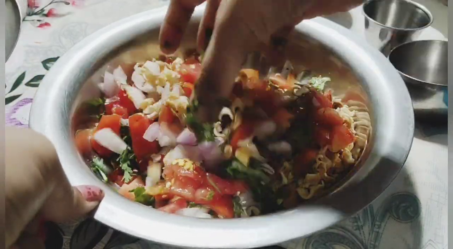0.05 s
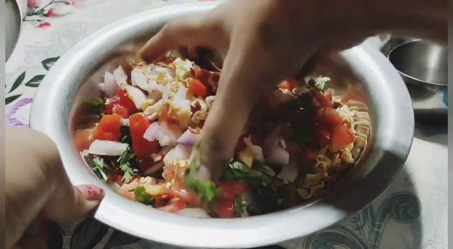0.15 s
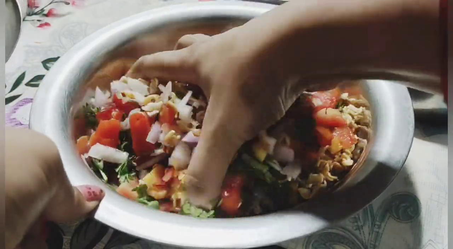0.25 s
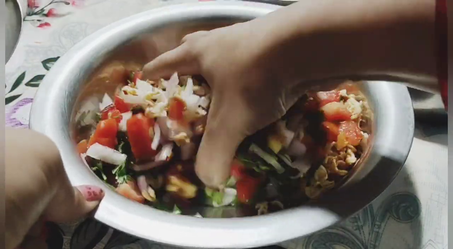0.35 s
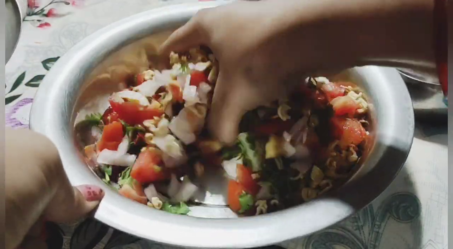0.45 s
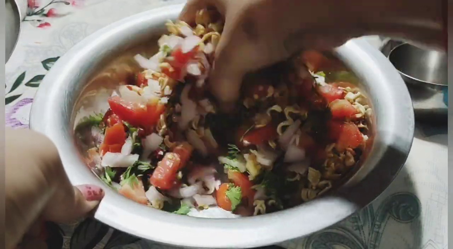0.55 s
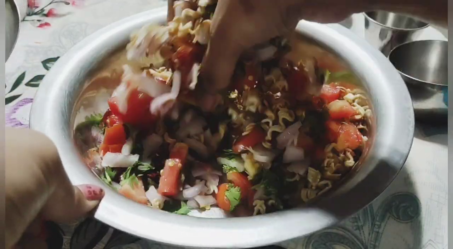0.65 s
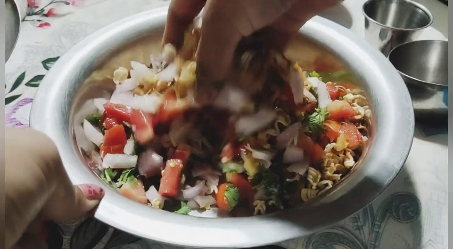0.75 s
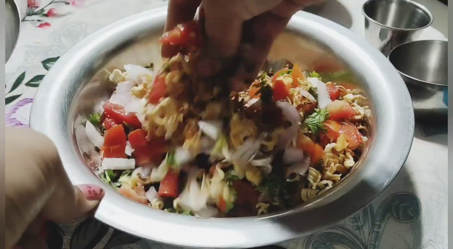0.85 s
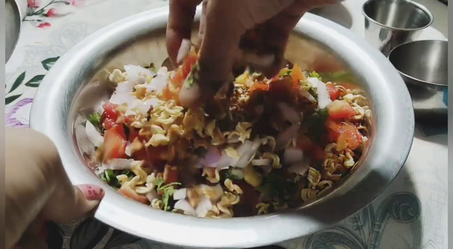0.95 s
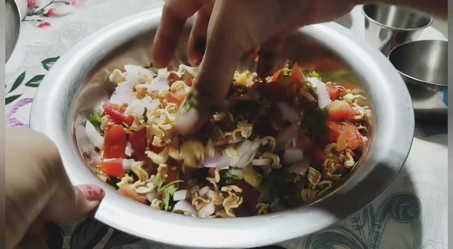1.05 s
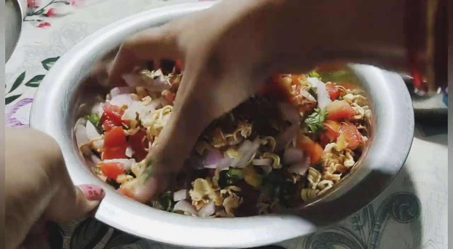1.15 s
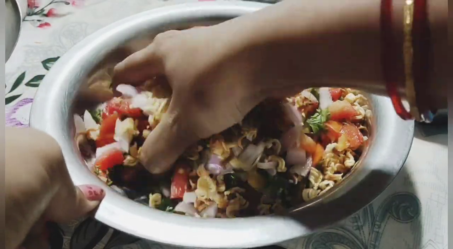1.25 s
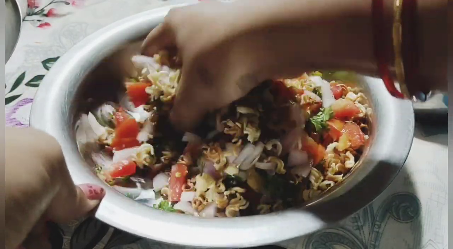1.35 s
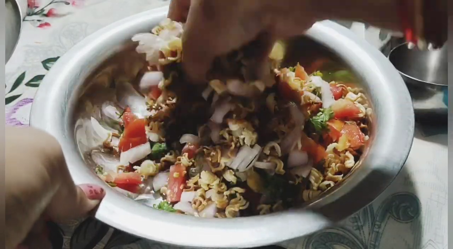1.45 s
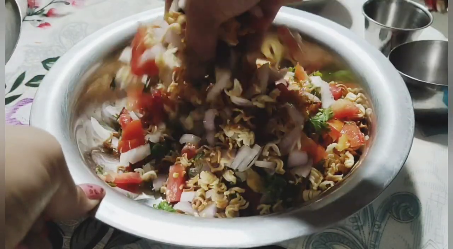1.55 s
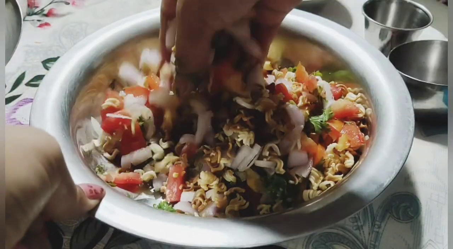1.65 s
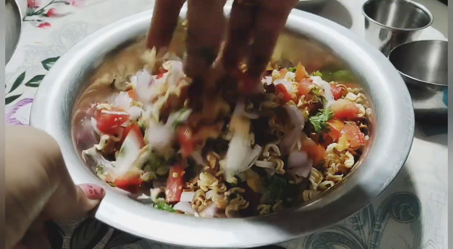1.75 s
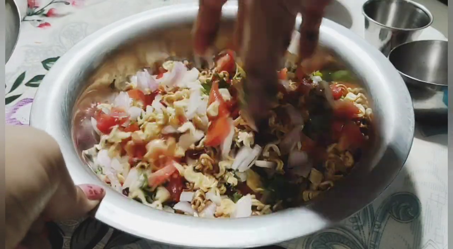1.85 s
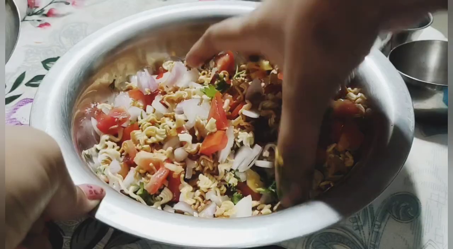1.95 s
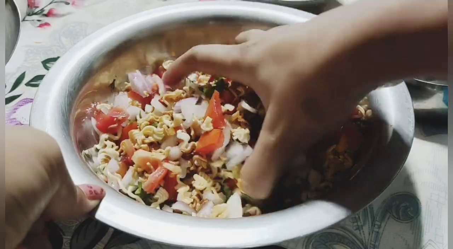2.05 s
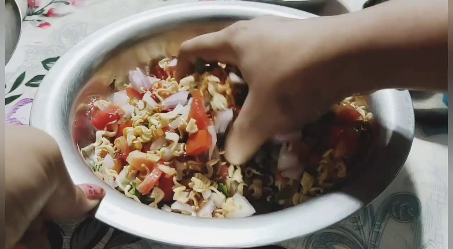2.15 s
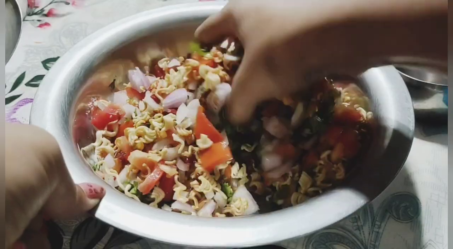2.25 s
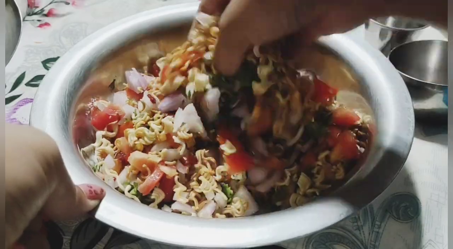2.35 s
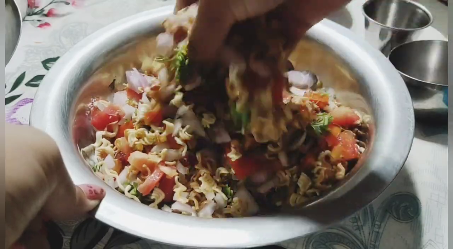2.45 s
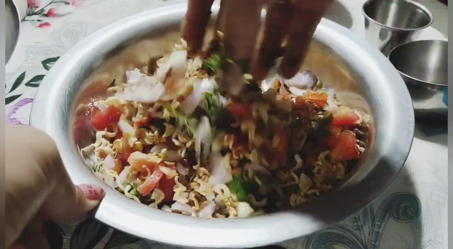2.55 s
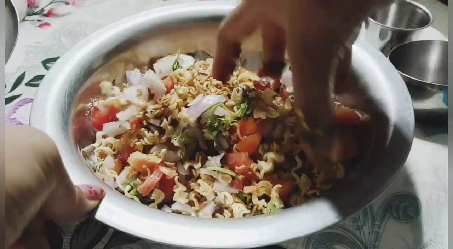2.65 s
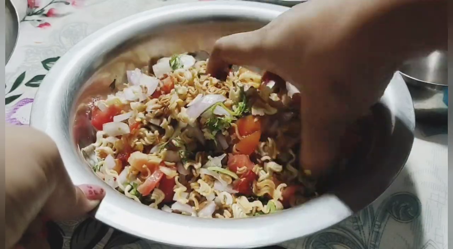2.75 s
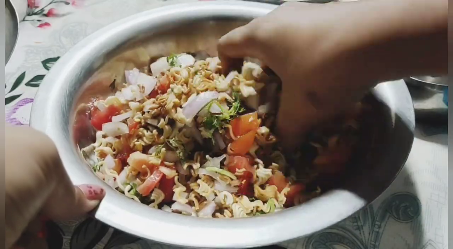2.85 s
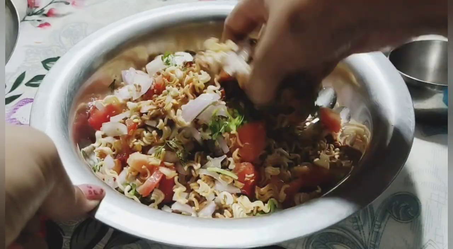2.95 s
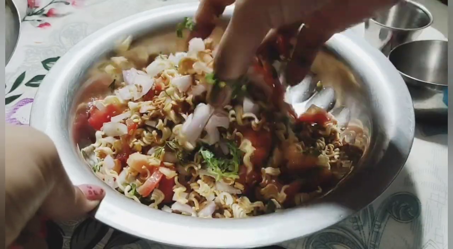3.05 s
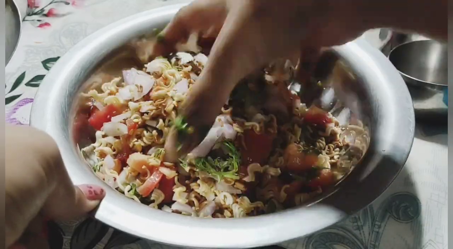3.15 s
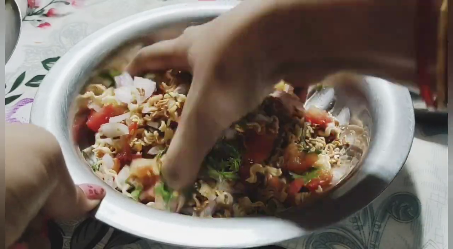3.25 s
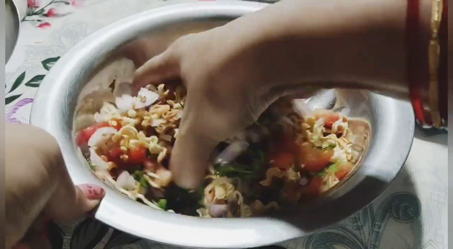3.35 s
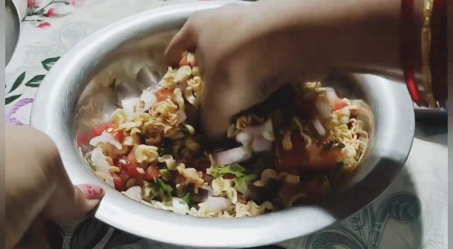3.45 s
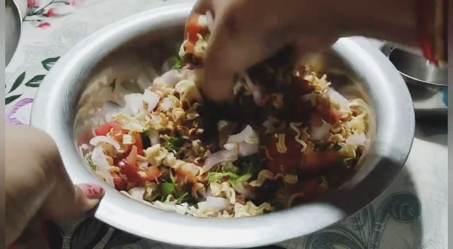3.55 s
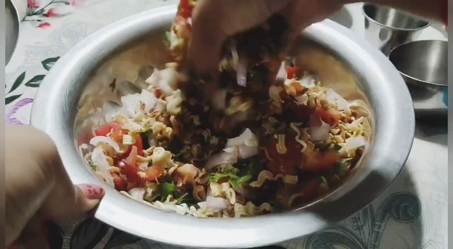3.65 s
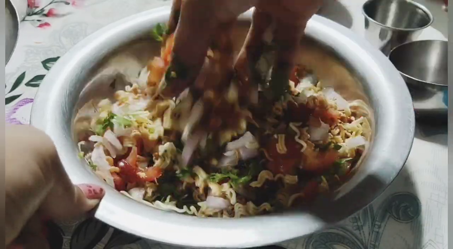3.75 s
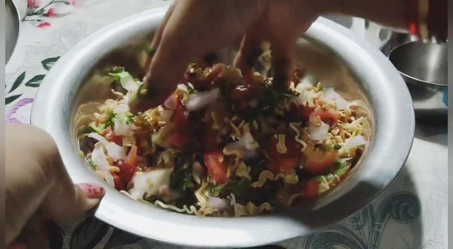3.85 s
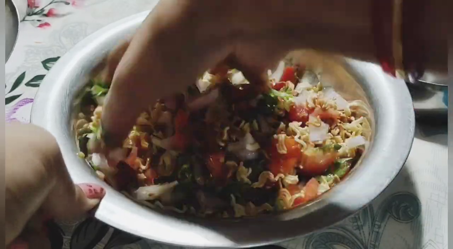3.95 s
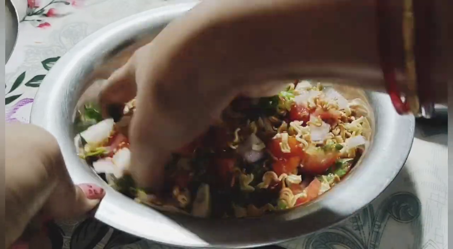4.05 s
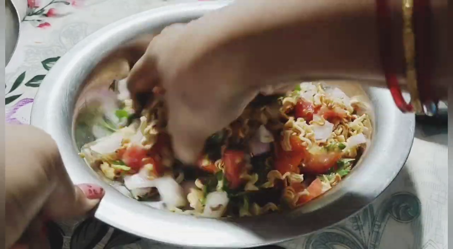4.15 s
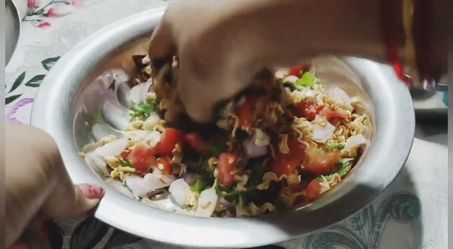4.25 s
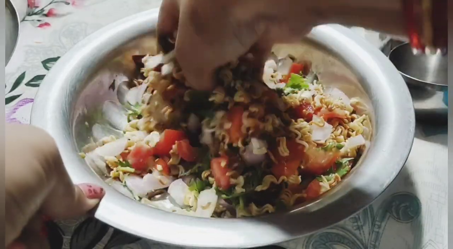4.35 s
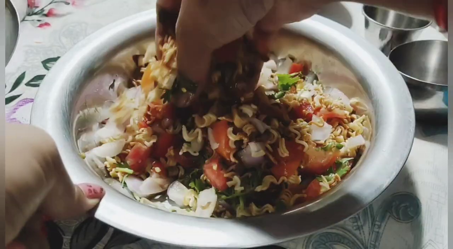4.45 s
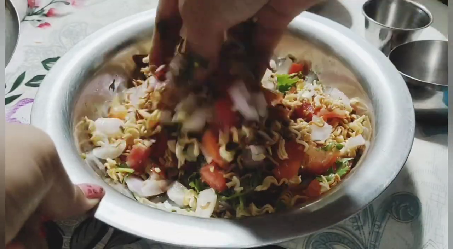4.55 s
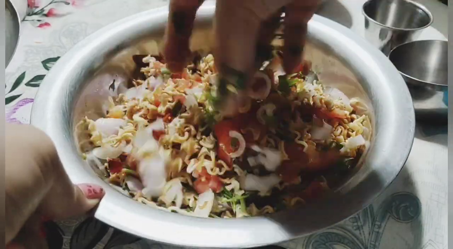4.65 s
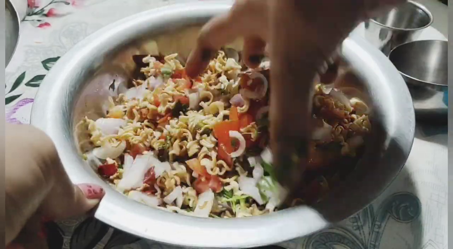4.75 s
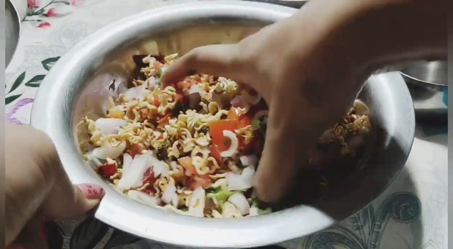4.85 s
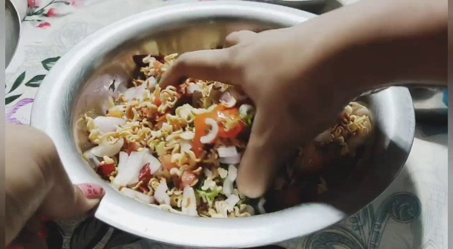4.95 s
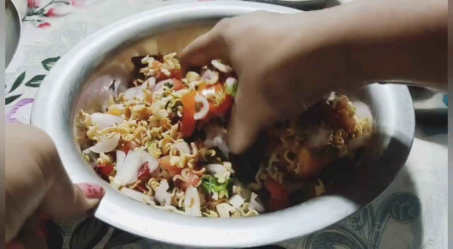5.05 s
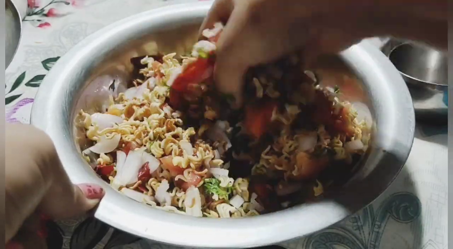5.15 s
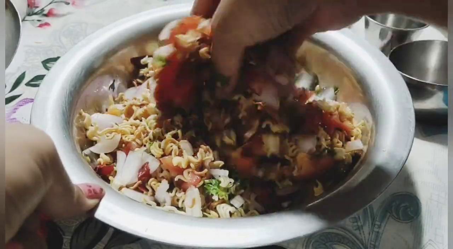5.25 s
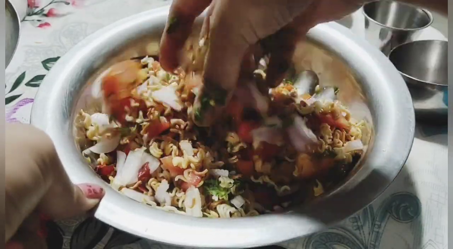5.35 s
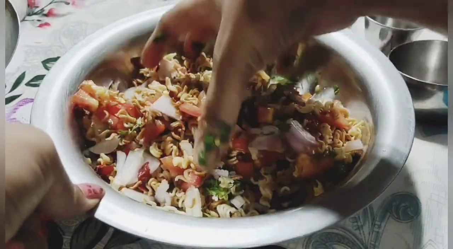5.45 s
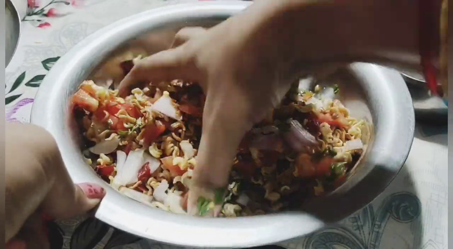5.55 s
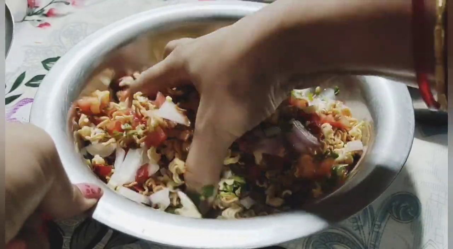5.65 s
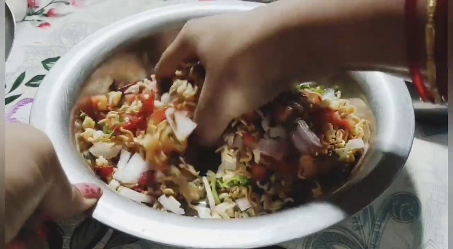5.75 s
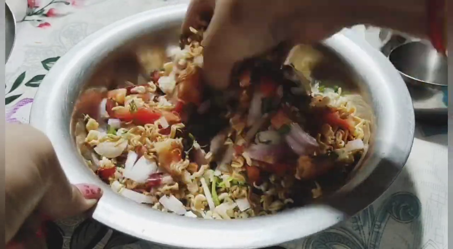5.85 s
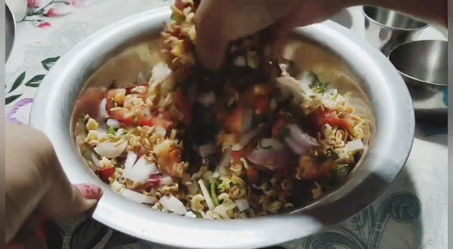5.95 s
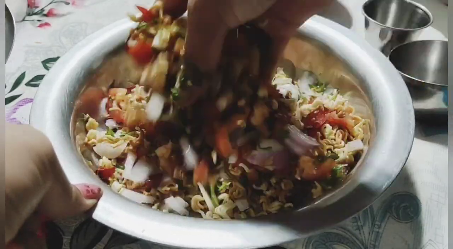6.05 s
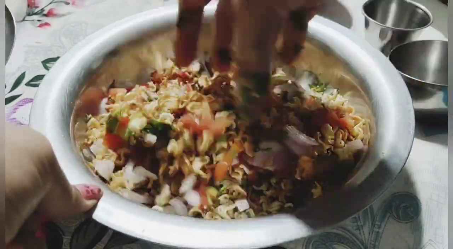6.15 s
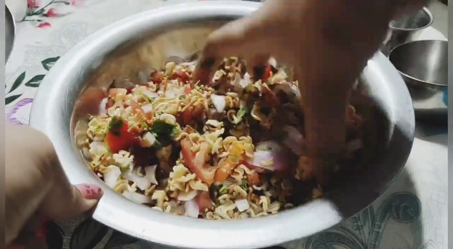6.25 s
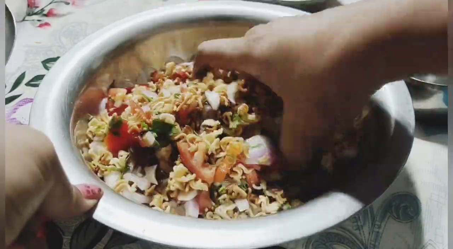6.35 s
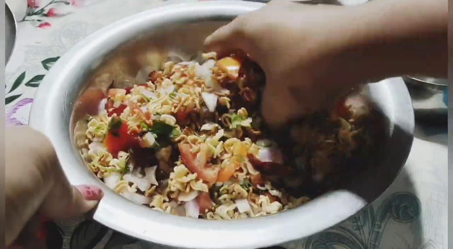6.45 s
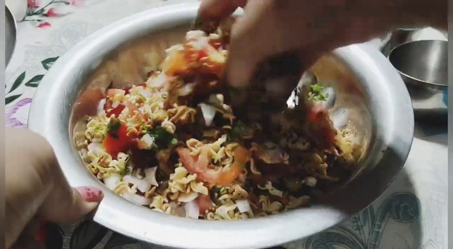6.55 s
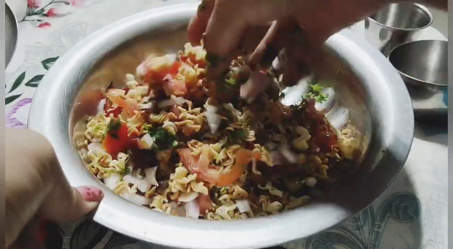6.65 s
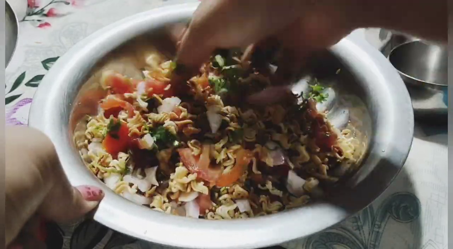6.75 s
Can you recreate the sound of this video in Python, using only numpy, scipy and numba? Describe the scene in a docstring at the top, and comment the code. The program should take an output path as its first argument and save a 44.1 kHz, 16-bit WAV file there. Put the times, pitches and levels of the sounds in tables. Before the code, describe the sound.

A close, dry stereo pickup in a small room with a barely audible hush. From the start a hand squeezes crisp noodle pieces in a steel bowl, dense crackle peaking near 0.3 s, then bits shower back around 0.6-0.9 s with very sharp snaps. Further crunchy scoops swell near 1.2, 2.0, 2.7 and 3.3 s, each with gritty grinding, muted steel scraping and low bowl bumps, followed by short pattering spills. A dull knock falls at 1.8 s and a hard snap at 2.5 s. Thin bangles clink faintly near 1.6, 3.05 and 3.75 s. Scoops around 4.1, 4.9 and 5.7 s are quieter, with more scrape and sparse ticks between. A fuller crunch returns near 6.3 s with a bright snap, then loose crumbs trickle until a last tick at 6.8 s.

```python
"""A hand tosses crisp fried noodle pieces and chopped vegetables in a steel bowl on a table, close to a phone.
Scoops crush the heap into a dense crackle of tiny filtered fractures, scrape the food-damped steel and bump
the bowl on the table. Loose food showers back, clumps grind on the wall and single pieces snap with sharp
ticks, each a short ring and a noisy crack. Soft thuds are swinging tones, bangles clink on the wrist as
fading sines, and a small room answers with decaying noise over a faint hush."""
import sys
import numpy as np
from scipy import signal
from scipy.fft import rfft, irfft, next_fast_len
from scipy.io import wavfile
from scipy.ndimage import uniform_filter1d
from numba import njit

SR = 44100
rng = np.random.default_rng(int(sys.argv[2]) if len(sys.argv) > 2 else 0)


def persist_wave(psi):
    """Save psi, clipped to +-1, as 16-bit WAV."""
    counts = np.round(np.clip(psi, -1, 1) * 32767).astype(np.int16)
    wavfile.write(sys.argv[1], SR, np.atleast_2d(counts).T)


N = 300476


def undb(db):
    """Decibels to gain."""
    return 10 ** (np.asarray(db) / 20)


def unit(x):
    """Scale to rms 1."""
    return x / np.sqrt(np.mean(x ** 2))


def unit_energy(x):
    """Scale each channel to energy 1."""
    return x / np.linalg.norm(x, axis=-1, keepdims=True)


def convolve(x, response):
    """Pass a stereo signal through a response."""
    return signal.fftconvolve(x, np.atleast_2d(response), axes=1)[:, :x.shape[1]]


def add(out, s, sound):
    """Mix a stereo sound in at time s."""
    start = max(int(s * SR), 0)
    out[:, start:start + sound.shape[1]] += sound[:, :max(N - start, 0)]


def walk(rate):
    """Random levels held 1 / rate s and slewed, scaled to rms 1."""
    hold = int(SR / rate)
    levels = rng.standard_normal(N // 20)[:N // hold + 1]
    return unit(uniform_filter1d(np.repeat(levels, hold), hold)[:N])


def colour(points, size=2048):
    """Minimum-phase response of unit energy with the given (Hz, dB) outline."""
    hz, db = np.transpose(points)
    bin_hz = np.arange(size // 2 + 1) * SR / size
    log_gain = np.log(undb(np.interp(np.log(bin_hz + 1), np.log(hz), db)))
    # folding the cepstrum forward in time makes the response causal
    fold = np.r_[1, np.full(size // 2 - 1, 2), np.zeros(size // 2)]
    return unit_energy(irfft(np.exp(rfft(irfft(log_gain) * fold))))


@njit
def resonate(x, hz, width):
    """State-variable band-pass whose centre may move, gain 1 at the centre."""
    y, band, low = np.empty(len(x)), 0., 0.
    for i in range(len(x)):
        g, damping = np.tan(np.pi * hz[i] / SR), width / hz[i]
        v = (band + g * (x[i] - low)) / (1 + g * (g + damping))
        band, low, y[i] = 2 * v - band, low + 2 * g * v, damping * v
    return y


def body(x, modes, drift, patchy_db, shifts_per_s=11):
    """Ring (Hz, width, dB) modes; shifting food retunes them and the moving hand favours one, then another."""
    load, out = walk(shifts_per_s), 0
    for k, (hz, width, db) in enumerate(modes):
        centre = hz * np.exp(drift * (load + walk(shifts_per_s)))
        favour = unit(undb(patchy_db * walk(shifts_per_s)))
        gain = (-1) ** k * undb(db) * favour  # neighbouring modes swing in opposition
        out = out + np.array([resonate(side * gain, centre, float(width)) for side in x])
    return out / np.sqrt(sum(undb(2 * db) * np.pi * width / SR for _, width, db in modes))


def grains(rate, spread_db, port_lag_s=0.00045):
    """Tiny contacts of uneven size, rms 1; each reaches the two microphones with its own lag."""
    chance, sign, place = rng.random((3, N))
    size = undb(spread_db * np.minimum(rng.exponential(size=N), 4))
    hits = (chance < rate / SR) * size * np.sign(sign - .5) / np.sqrt(rate)
    lag = np.round((2 * place - 1) * port_lag_s * SR).astype(int)
    arrival = np.clip(np.arange(N) + lag, 0, N - 1)
    return unit(np.array([hits, np.bincount(arrival, hits, N)]))


def scatter(x, echo_db, fade_s, moves_per_s=9, size=512, count=7):
    """Add the quick echoes inside the bowl; they differ for each microphone and change as the hand moves."""
    fade = np.exp(-np.arange(size) / SR / fade_s)
    paths = unit_energy(rng.standard_normal((count, 2, size)) * fade)
    paths[:, :, 0] = 0
    shares = np.array([walk(moves_per_s) for _ in range(count)])
    shares /= np.linalg.norm(shares, axis=0)
    echoes = sum(convolve(x * share, path) for share, path in zip(shares, paths))
    return (x + undb(echo_db) * echoes) / np.sqrt(1 + undb(2 * echo_db))


def squeeze(t, start, hardest, end, swell_power=1, ease_power=2.15):
    """Effort of one scoop, 0-1: it swells to its hardest, then eases as the hand lifts."""
    swell, ease = np.clip([(t - start) / (hardest - start), (end - t) / (end - hardest)], 0, 1)
    return np.sin(np.pi / 2 * swell) ** swell_power * np.sin(np.pi / 2 * ease) ** ease_power


def shower(t, start, length, attack_s=0.013, sag_db=4.5, release_s=0.017, crumbs_db=-8.5, crumbs_s=0.051):
    """Flow of one spill, 0-1: a quick attack, a sagging hold, a release and a trickle of crumbs."""
    age = t - start
    after = np.maximum(age - length, 0)
    hold = undb(-sag_db * np.clip(age / length, 0, 1))
    release = np.maximum(np.exp(-after / release_s), undb(crumbs_db) * np.exp(-after / crumbs_s))
    return np.clip(age / attack_s, 0, 1) * hold * release


def handwork(scrape_lag_s=0.016, push_lead_s=0.014, size=4096):
    """Levels in dB of crackle, coarse crunch, splinters, scrape and push; all moves add in power."""
    # the hand digs in, squeezes and lifts: start_s, hardest_s, end_s, crackle_db,
    # then over the crackle: coarse_db, crisp_db, scrape_db, push_db
    scoops = [(0.005, 0.297, 0.71, -25, -4.5, -7, -3, -13),
              (0.996, 1.204, 1.56, -25.5, -6, -6, -6.5, -13.5),
              (1.881, 2.037, 2.487, -29.5, -1, -6.5, -1.5, -8),
              (2.641, 2.668, 3.093, -24, -5.5, -6, -7, -15),
              (3.107, 3.32, 3.71, -27, -3.5, -9.5, -5.5, -14.5),
              (3.674, 4.12, 4.35, -36.5, 1, -5.5, -1, -8), (4.71, 4.906, 5.147, -36.5, -1, -6, 3, -2.5),
              (5.441, 5.671, 5.97, -34, 2.5, -6, 1.5, -10),
              (6.161, 6.32, 6.63, -29.5, -8.5, -7, -4.5, -15.5)]
    # loose food showers back on the heap: start_s, length_s, crackle_db,
    # then over the crackle: coarse_db, crisp_db, scrape_db, push_db
    spills = [(0.573, 0.056, -32, -10, -3, 2, -10.5), (0.648, 0.11, -34, 4, 1, 3, -8),
              (0.826, 0.12, -31, -3, -6.5, -8, -8), (0.966, 0.086, -32, -17, -4, -10, -7),
              (1.417, 0.086, -28, -4.5, -3.5, -7, -8), (1.559, 0.065, -32.5, 0, 1.5, -6, -12),
              (1.733, 0.09, -33.5, 3.5, -10, -19, -8), (1.784, 0.085, -34, 3.5, -1.5, 0.5, -9),
              (2.448, 0.081, -35.5, 5.5, -1, 0, -4), (2.516, 0.14, -32.5, -6, -10.5, -7.5, -16),
              (2.984, 0.054, -35.5, -3.5, -8.5, -5, -13), (3.031, 0.079, -30, 3, -2, -9, -24),
              (3.549, 0.069, -35.5, 3, -5.5, -0.5, -17), (3.726, 0.089, -31.5, -4, -4, -9, -21),
              (3.826, 0.16, -35.5, -6, -11, -8, -10.5), (4.261, 0.072, -40.5, 1.5, -3.5, 0, -23),
              (4.375, 0.074, -46, 2, 2, -8, -7), (4.458, 0.045, -28.5, -3, -4, -18, -19),
              (4.614, 0.047, -35.5, -5, -2, -14, -19), (4.641, 0.057, -32, -6.5, -5, -7, -23),
              (5.095, 0.082, -50, 2, -9, 0, -3), (5.298, 0.052, -48.5, -7, -4.5, -7, 0),
              (5.369, 0.038, -39, -7, -7.5, -1, -3), (5.46, 0.047, -28.5, -20, -7, -6, -8.5),
              (6.029, 0.047, -44, 0, -6, -29, -20), (6.057, 0.097, -33.5, 0.5, -2, -21, -6.5),
              (6.179, 0.073, -30.5, -0.5, -11, -23, -8), (6.459, 0.045, -30, -6, -19, -6, -29),
              (6.649, 0.01, -36.5, 2.5, -58, 0, -1), (6.721, 0.099, -40, -15, -27, -1, -6),
              (6.774, 0.047, -35, -11, -5, -13, -7.5)]
    # the heap settling between tosses: crackle_db, coarse_db, crisp_db, scrape_db, push_db
    settling = (-56, -63.5, -62, -57, -54)
    t = np.linspace(0, N / SR, size)
    # in a scoop the food meets the wall a little after the squeeze; the fingers bump the bowl a little before
    lagged = t - np.array([0, 0, 0, scrape_lag_s, -push_lead_s])[:, None]
    moves = [(squeeze(lagged, start, hardest, end), levels) for start, hardest, end, *levels in scoops]
    moves += [(shower(t, start, length), levels) for start, length, *levels in spills]
    power = undb(settling)[:, None] ** 2
    for shape, (db, *over_db) in moves:
        peak = undb(db + np.array([0, *over_db]))[:, None]
        power = power + (shape * peak) ** 2
    return [np.interp(np.arange(N) / SR, t, 10 * np.log10(p)) for p in power]


def strands(points, rate, spread_db, low_hz, high_hz, width_hz, snap_db, port_lag_s,
            wander=0.8, count=13, size=110):
    """Fractures of rms 1; each strand breaks for a few ms and rings over a broad crack, in wandering pitch."""
    breaks = grains(rate, spread_db, port_lag_s)
    own = np.repeat(rng.standard_normal(N // size + 1), size)[:N]
    strand = np.round(count / 2 + 2 * own + wander * walk(25)) % count  # a clump shares its pitch
    rings = 0
    for k, hz in enumerate(np.geomspace(low_hz, high_hz, count)):
        b, a = signal.iirpeak(hz, max(hz / width_hz, 1), fs=SR)
        rings = rings + signal.lfilter(b, a, breaks * (strand == k))
    fractures = unit(rings) + undb(snap_db) * breaks
    return unit(convolve(scatter(fractures, echo_db=0.5, fade_s=0.0043), colour(points)))


def crackle(db, coarse_db, crisp_db, fractures_per_s=1500, firm_db=-34, thin_db=-2.0, thick_db=-1.76,
            edge_db=0, clump_db=1.3, shift_db=1.1, air_db=-12, air_growth=0.73):
    """Noodles crush in small avalanches; a harder squeeze breaks more strands and grinds out airy crumbs."""
    # colours of thin strands, thick pieces, splinters and crumbs: pitch_hz, level_db
    thin_colour, thick_colour = [(800, -27.5), (1800, -34.5), (2500, -8.5), (3300, -6), (4300, -6),
                                 (5000, -7.5), (5600, -26), (7000, -27), (10000, -52), (16000, -40)], [(250, -31), (600, -5), (1100, 4.5), (1450, 3.5),
                                                 (1950, 8.5), (2700, 2.5), (3500, 9), (6000, -2),
                                                 (12000, -66)]
    splinter_colour, crumb_colour = [(2000, -17.5), (5500, -0.5), (7000, -5), (8200, 0.5), (9100, -1.5),
                                     (10300, -3), (11800, -8), (14000, -10), (15500, -13.5)], [(4000, -21), (6200, 7), (8000, -12), (11000, 4.5),
                                                    (13500, 1), (15500, -13)]
    rate = fractures_per_s * undb(.6 * (db - firm_db)) + 400
    airy_db = crisp_db + air_db + air_growth * (db - firm_db)
    db = db + clump_db * walk(220)
    thin = strands(thin_colour, rate, spread_db=2.0, low_hz=2447, high_hz=4814, width_hz=143,
                   snap_db=12.5, port_lag_s=.00003)
    thick = strands(thick_colour, .6 * rate, spread_db=-1.0, low_hz=1037, high_hz=2950, width_hz=330,
                    snap_db=13.5, port_lag_s=.00006)
    splinters = strands(splinter_colour, 2 * rate, spread_db=1.0, low_hz=7640, high_hz=10760, width_hz=1200,
                        snap_db=10.5, port_lag_s=.0003)
    crumbs = convolve(grains(3 * rate, spread_db=-16.0, port_lag_s=0.00018), colour(crumb_colour))
    layers = [(thin, thin_db), (thick, coarse_db + thick_db),
              (splinters, crisp_db + edge_db), (crumbs, airy_db)]
    return sum(sound * undb(db + layer_db + shift_db * walk(35)) for sound, layer_db in layers)


def bowl(scrape_db, push_db, steel_db=0, table_db=0.0, rock_db=-7, firm_db=-41, rock_growth=0.057,
         low_cut_hz=66, knock_s=.015):
    """Food drags and knocks on the steel wall; fingers bump the bowl, and harder pushes rock it a little more."""
    # steel wall damped by the food, loaded bowl on the table, bowl rocking: resting_hz, width_hz, level_db
    steel_modes, table_modes, rock_modes = [(540, 350, -13), (690, 340, -9.5), (796, 117, -7.5),
                                            (921, 102, -4.5), (971, 59, 1), (1081, 54, 0),
                                            (1133, 107, -8.5), (1360, 100, -7)], [(194.3, 15.3, 0), (236.3, 20.5, 1),
                                                           (292, 38.5, -5), (333.5, 23, -1.5),
                                                           (388, 41, -5), (525, 80, -16)], [(94, 6, -5), (122.4, 22.5, -9),
                                                                          (166, 16.2, 2)]
    # single knocks on the wall: start_s, level_db
    wall_knocks = [(0.433, -21.5), (.47, -24.5), (2.09, -29), (4.148, -27), (4.982, -27), (5.07, -32.5),
                   (5.746, -20.5), (5.762, -27), (6.072, -44), (6.338, -30)]
    drag = grains(1100, spread_db=2.0, port_lag_s=0.00028) * undb(scrape_db + steel_db)
    for s, db in wall_knocks:
        add(drag, s, np.full((2, 1), undb(db) * np.sqrt(knock_s * SR)))  # one-sample blow
    bumps = grains(450, spread_db=2.0, port_lag_s=0.00032) * undb(push_db + table_db)
    heave_db = push_db + rock_db + rock_growth * (push_db - firm_db)
    heaves = grains(260, spread_db=3.0, port_lag_s=0.00039) * undb(heave_db)
    thumps = body(bumps, table_modes, drift=0.029, patchy_db=2.5)
    thumps = thumps + body(heaves, rock_modes, drift=0.019, patchy_db=0.0) + thuds()
    # a small bowl sends out no deep bass
    radiated = signal.sosfilt(signal.butter(3, low_cut_hz, "high", fs=SR, output="sos"), thumps)
    return body(drag, steel_modes, drift=0.02, patchy_db=2.0, shifts_per_s=22) + radiated


def room_hush(level_db=-71):
    """The empty room: a faint, steady noise of dense coloured grains."""
    # colour of the hush: pitch_hz, level_db
    hush_colour = [(20, -24), (60, -13), (170, -8), (400, 1), (1000, 2), (4000, -11), (15000, -50)]
    return undb(level_db) * convolve(grains(19000, spread_db=0), colour(hush_colour))


def snaps(pieces, ring_s=0.00046, ring_db=0.5, crack_db=-4, knock_db=-1, edge_db=1.5, crumble_db=-2,
          rise_s=.0004, crack_s=.0016, level_s=.004, pan_mean_db=-1, pan_spread_db=4.5, size=1024):
    """A brittle piece gives way: a few cycles of its pitch, a crumbling crack, a knock and a crisp edge."""
    # colours of the crack, the knock on the steel and the crisp edge: pitch_hz, level_db
    colours = [colour(points) for points in ([(700, -8), (1800, -15.5), (2600, 15), (4500, 13.5),
                                              (5300, 13), (7000, -7.5), (15000, -40)], [(40, -30), (150, -8), (500, -7.5),
                                                             (1000, 12.5), (1800, 20.5), (2600, 13.5),
                                                             (5000, 15), (15000, -78)], [(3000, -26), (6000, -9),
                                                                            (7200, -2), (8400, 13),
                                                                            (9600, 14.5), (10600, 6.5),
                                                                            (11800, -9), (15500, -8)])]
    out, t = np.zeros((2, N)), np.arange(size) / SR
    for s, db, hz, low_db, top_db in pieces:
        pan_db = pan_mean_db + pan_spread_db * rng.standard_normal()  # left minus right
        noise = rng.standard_normal(size) + 4.1 * rng.standard_normal((2, size))  # shared, then per microphone
        burst = noise * np.exp(-t / crack_s) * (1 - np.exp(-t / rise_s))
        blow = (t == 0) + undb(crumble_db) * unit_energy(burst)
        crack, low, top = (unit_energy(convolve(push, c)) for push, c in zip((blow, blow, burst), colours))
        phase = 2 * np.pi * rng.random() + rng.uniform(-2.26, 1.0, (2, 1))
        ring = unit_energy(t * np.exp(-t / ring_s) * np.sin(2 * np.pi * hz * t + phase))
        tick = unit_energy(undb(ring_db) * ring + undb(crack_db) * crack)
        tick = tick + undb(low_db + knock_db) * low + undb(top_db + edge_db) * top
        sides = np.sqrt(2) * unit_energy(undb([pan_db / 2, -pan_db / 2]))
        add(out, s, tick * np.sqrt(level_s * SR) * undb(db) * sides[:, None])
    return out


def strays(crackle_db, per_s=24, over_db=-0.5, spread_db=1.5, follow=0.75, usual_db=-33, usual_hz=3500,
           octaves=0.25, knock_db=-6.5, edge_db=-39, colour_spread_db=5, count=200):
    """Rows of lesser snaps at uneven gaps, louder while the heap is worked harder."""
    times = np.cumsum(rng.uniform(.1, 1.9, count)) / per_s
    chances = np.clip(rng.standard_normal((count, 4)), -2, 2)
    rows = []
    for s, (force, pitch, knock, edge) in zip(times, chances):
        if s * SR < N:
            worked_db = usual_db + follow * (crackle_db[int(s * SR)] - usual_db)
            db = worked_db + over_db + spread_db * force
            hz = usual_hz * 2 ** (octaves * pitch)
            rows.append((s, db, hz, knock_db + colour_spread_db * knock, edge_db + colour_spread_db * edge))
    return rows


def grinding(contacts_per_s=900, width_share=0.45, pitch_spread=0.071, edge_s=0.024):
    """Clumps pinned against the steel grind into hard grains; the pitch shifts as the clump breaks up."""
    # the fingers pin a clump on the wall: start_s, length_s, level_db, pitch_hz
    grinds = [(.24, 0.16, -33, 2060), (1.186, 0.073, -29.5, 1930), (1.568, 0.027, -34, 2200),
              (2.005, .1, -28, 2260), (2.64, .15, -26, 2580), (3.038, 0.045, -22.5, 2200),
              (3.508, .035, -39, 2180), (4.907, 0.12, -35, 2270), (5.716, 0.066, -32, 2520),
              (6.253, 0.12, -31.5, 2720)]
    t = np.arange(N) / SR
    start, length, _, hz = np.transpose(grinds)
    pressure = 0
    for s, held, db, _ in grinds:
        pressure = pressure + undb(db) * np.clip(np.minimum(t - s, s + held - t) / edge_s, 0, 1)
    centre = np.interp(t, start + length / 2, hz) * np.exp(pitch_spread * walk(120))
    width = float(width_share * np.mean(hz))
    grit = scatter(grains(contacts_per_s, spread_db=2.2, port_lag_s=0.00006), echo_db=2.5, fade_s=0.0019)
    ringing = [resonate(resonate(side, centre, width), centre, 2 * width) for side in grit]
    return pressure * unit(np.array(ringing))


def thuds(rise_s=0.00086, mush=0.52, mush_hz=260, size=16384):
    """Dull, short swings of the whole bowl; soft food settling on it makes them uneven."""
    # soft blows, as a handful lands or the bowl rocks: start_s, level_db, pitch_hz, t60_s
    blows = [(0.282, -30, 166, 0.17), (.995, -30, 180, 0.094), (1.155, -37, 94, 0.34),
             (1.226, -29.5, 166, 0.35), (1.251, -37, 89, 0.51), (1.452, -35, 179, 0.1),
             (1.814, -13, 730, 0.014), (1.956, -31.5, 171, 0.18), (2.04, -29, 162, 0.17),
             (3.316, -40, 91, 0.28), (4.655, -29, 620, 0.041), (4.906, -36, 157, 0.18),
             (5.325, -31, 358, 0.078), (5.491, -33, 163, 0.23), (5.618, -28.5, 166, 0.19),
             (6.2, -44.5, 95, 0.33), (6.319, -31, 172, 0.096)]
    out, t = np.zeros((2, N)), np.arange(size) / SR
    slow = signal.butter(2, mush_hz, fs=SR, output="sos")
    for s, db, hz, t60 in blows:
        settle = mush * unit(signal.sosfilt(slow, rng.standard_normal(size)))
        swing = np.sin(2 * np.pi * hz * t + settle * hz / mush_hz)  # the quicker swings are blurred most
        fade = (1 - np.exp(-t / rise_s)) * np.exp(-np.log(1000) * t / t60)
        add(out, s, undb(db) * (fade * swing)[None])
    return out


def bangles(lead_db=12, lead_t60=0.26, chatter=1.0, chatter_per_s=190, uneven_db=1, size=16384):
    """Thin rings that sing on briefly after each knock, chattering against one another; the one struck leads."""
    # knocks: start_s, level_db, share of the free ring time that the wrist allows, lead_hz, low_ring_db
    clinks = [(1.586, -38, 0.3, 4980, -7), (3.043, -42, 0.5, 4440, 5), (3.066, -41.5, .9, 5233, 7.5),
              (3.747, -43, 0.6, 4958, 1), (4.47, -50, 0.7, 4931, 13), (5.32, -59, 0.9, 4950, 14)]
    # upper and low modes of the bangles ringing free: pitch_hz, level_db, t60_s
    upper_modes, low_modes = [(4468, 2, 0.22), (4880, 3, 0.14), (6310, -5, 0.21), (7240, -11, 0.13),
                              (8600, -1, .14), (8900, -3, .22), (12270, -15, .25)], [(1918, 0, 0.42), (1885, -8, 0.3)]
    out, t = np.zeros((2, N)), np.arange(size) / SR
    for s, db, free, lead_hz, low_db in clinks:
        low = [(hz, mode_db + low_db, t60) for hz, mode_db, t60 in low_modes]
        for hz, mode_db, t60 in [(lead_hz, lead_db, lead_t60), *low, *upper_modes]:
            touch = np.interp(t * chatter_per_s, np.arange(400), rng.standard_normal(400))
            fade = np.exp(-np.log(1000) * t / (t60 * free)) * (1 + chatter * touch)
            phase = 2 * np.pi * rng.random() + rng.uniform(-0.77, 1, (2, 1))
            gain = undb(db + mode_db + uneven_db * rng.standard_normal())
            add(out, s, gain * fade * np.sin(2 * np.pi * hz * t + phase))
    return out


def ports(x):
    """Standing waves in the bowl reach the two microphones in step at some pitches and opposed at others."""
    # phase of the right microphone ahead of the left: pitch_hz, phase_radians
    port_phase = [(600, 0), (1000, 0.3), (1350, 2.5), (1900, 4), (2200, 1.3), (2750, -0.4), (3150, -2),
                  (3650, -4), (3950, -2.14), (4250, 0.83), (5200, 0.5), (5600, 5), (6400, -1)]
    hz, radians = np.transpose(port_phase)
    size = next_fast_len(N + SR // 10)
    turn = np.interp(np.arange(size // 2 + 1) * SR / size, hz, radians)
    return irfft(rfft(x, size) * np.exp(.5j * np.array([-turn, turn])), size)[:, :N]


def room(x, wet_db, t60, bright_t60, split_hz=5500, size=22050):
    """A small room as fading noise; treble dies at its own rate and the bass is alike on both sides."""
    t = np.arange(size) / SR
    noise = rng.standard_normal((2, size))
    bass = signal.sosfilt(signal.butter(2, 450, fs=SR, output="sos"), noise)
    noise = noise - bass + bass[0]
    dull = signal.sosfilt(signal.butter(2, split_hz, fs=SR, output="sos"), noise)
    bright = noise - dull
    tail = dull * np.exp(-np.log(1000) * t / t60) + bright * np.exp(-np.log(1000) * t / bright_t60)
    tail *= 1 - np.exp(-t / 0.0004)
    return x + undb(wet_db) * convolve(x, tail / np.linalg.norm(tail[0]))


def scene():
    """Crackle, grinding, bowl, snaps and bangles in the room, over its faint hush."""
    # loudest pieces that snap or strike the bowl: start_s, level_db, pitch_hz,
    # then over that level, before the trims in snaps(): knock_db, crisp_edge_db
    loud_snaps = [(.026, -35.5, 3630, 6, -10), (.043, -30.5, 2290, 6.5, -19), (.079, -32.5, 3340, 10, -21),
                  (.094, -21, 3800, 0, -8.5), (.169, -22, 3860, -13, -17), (.272, -22, 3320, 1, -4),
                  (.292, -20, 3820, 0.5, -21), (.361, -20, 4340, -14, -26), (.398, -23, 3230, -12, -18),
                  (.431, -30, 3240, 8, -20), (.4745, -13.5, 3370, -10, -14), (.594, -20.5, 4180, -10, -6),
                  (.596, -13, 3500, -8, -19), (.665, -31.5, 3500, 8.5, -1), (.684, -40, 3500, -5, 16),
                  (.739, -30.5, 4330, 8.5, -5), (.818, -10.5, 3800, -8, -18), (.834, -8, 4190, -29, -15.5),
                  (.836, -15.5, 2670, -5, -7), (.919, -15, 3850, -19, -17), (.982, -20, 3330, -10, -9.5),
                  (1.002, -18.5, 3200, -12, -14), (1.0155, -19, 3150, -9, -19),
                  (1.024, -27, 3190, -15, -16), (1.456, -25, 4100, -8, -16), (1.472, -24, 4400, -8, -12),
                  (1.584, -22, 4560, -14, -1.5), (1.622, -36, 4500, -12, 1), (1.714, -30.5, 3500, -9, -4),
                  (1.7328, -12, 3140, -10, -16.5), (1.78, -23.5, 3580, -10, -1.5),
                  (1.803, -26, 4180, -1, -20), (1.865, -36, 4430, -10, 2), (1.946, -30, 3860, -20, -17),
                  (2.086, -20, 2150, -8, -15), (2.0945, -15, 2200, -7, -24), (2.188, -24.5, 4260, -2, -14),
                  (2.244, -30, 4260, -18, -18), (2.312, -38, 4200, 0, -12), (2.454, -28.5, 2900, 6, 0),
                  (2.477, -15.5, 3600, -30, -27), (2.487, -15, 3740, -16, -7.5),
                  (2.511, -9.5, 3750, -8.5, -38), (2.598, -41, 3670, -12, -18), (2.821, -23, 3650, -9, -13),
                  (3.044, -19.5, 4600, -3, -9), (3.065, -15.5, 4940, -9, -8), (3.466, -23, 4011, -19, -13),
                  (3.516, -24, 2210, -3, -14), (3.565, -32, 3500, -14, -22), (3.605, -31, 3340, -14, -18),
                  (3.656, -32.5, 3500, -20, -24), (3.751, -20.5, 4550, -13, 1.5),
                  (3.766, -20, 4260, -8, -10), (3.804, -29, 3470, -4, -7), (3.88, -34, 3450, -14, -20),
                  (3.901, -23, 3530, -14, -30), (3.938, -22, 3400, -5, -18),
                  (4.092, -24.5, 4020, -1.5, -25), (4.146, -33, 2620, 12.5, -5),
                  (4.154, -25.5, 4100, 2.5, -21), (4.362, -24, 4030, -16, -4), (4.39, -26, 3900, -23, -7.5),
                  (4.422, -26, 3380, -9, -31), (4.472, -27.5, 3130, -7, 3.5),
                  (4.476, -27.5, 3630, -1, -3.5), (4.491, -31, 3600, -9, -8), (4.527, -29, 4050, -14, -10),
                  (4.535, -30, 3620, -10, -14), (4.548, -33.5, 3800, -18, -2),
                  (4.6055, -24, 3520, -30, 2.5), (4.644, -23.5, 3600, -11, -18),
                  (4.663, -29, 3200, -15, -4), (4.693, -24.5, 3400, -7, -18),
                  (4.886, -28.5, 3660, -18, -18), (4.9815, -24, 2650, -3, -22),
                  (5.005, -27.5, 2150, -6, -22), (5.07, -41, 3500, 8.5, -27), (5.098, -40, 2970, 7, -26),
                  (5.163, -46, 5700, -17, -7), (5.195, -45.5, 4370, 5.5, -13), (5.282, -39, 3870, -17, -23),
                  (5.29, -30, 4100, -13, -11.5), (5.326, -45, 3950, -8, -6), (5.418, -36, 3200, -20, -14),
                  (5.546, -29, 3620, -14, -20), (5.571, -26, 4100, -14, -20),
                  (5.663, -22.5, 3500, 4.5, -21), (5.738, -26, 2800, 9, -9.5), (5.749, -21, 3300, -14, -18),
                  (5.763, -43, 2810, 2, -14), (5.799, -32, 3530, -12, -20), (5.881, -26, 4400, -4, -20),
                  (6.037, -37.5, 4220, -12, -14), (6.071, -34.5, 2890, 8, 4), (6.107, -30, 3620, -6, 1),
                  (6.277, -25, 2450, -5, -25), (6.3155, -22.5, 4970, -7, -12), (6.34, -13, 3500, -9.5, -22),
                  (6.472, -27.5, 3490, -7, -14), (6.477, -23.5, 3380, -8, -16), (6.583, -35, 3130, -2, -30),
                  (6.633, -39, 3000, -3, -28), (6.656, -26.5, 3900, -13, -41),
                  (6.667, -35, 3530, -13, -28.5), (6.732, -42, 3300, -12, -31),
                  (6.751, -34, 3800, -12, -20), (6.794, -17, 3500, -8, -7.5)]
    db, coarse_db, crisp_db, scrape_db, push_db = handwork()
    heap = ports(crackle(db, coarse_db - db, crisp_db - db) + grinding() + bowl(scrape_db, push_db))
    ticks = ports(snaps(loud_snaps + strays(db))) + bangles()
    # the heap is shielded by the hand and the bowl, so less of it reaches the walls
    shielded = room(heap, wet_db=-10.0, t60=0.25, bright_t60=0.17)
    return shielded + room(ticks, wet_db=-6.0, t60=0.11, bright_t60=0.12) + room_hush()


def record(dry, low_cut_hz=55, overload=.85, top_hz=15900):
    """The phone thins the deep bass, overloads smoothly on the sharpest snaps and cuts the top."""
    thinned = signal.sosfilt(signal.butter(1, low_cut_hz, "high", fs=SR, output="sos"), dry)
    limited = thinned / (1 + (thinned / overload) ** 4) ** (1 / 4)
    return signal.sosfilt(signal.ellip(10, .2, 80, top_hz, fs=SR, output="sos"), limited)


dry = scene()
out = record(dry)
persist_wave(out)
```